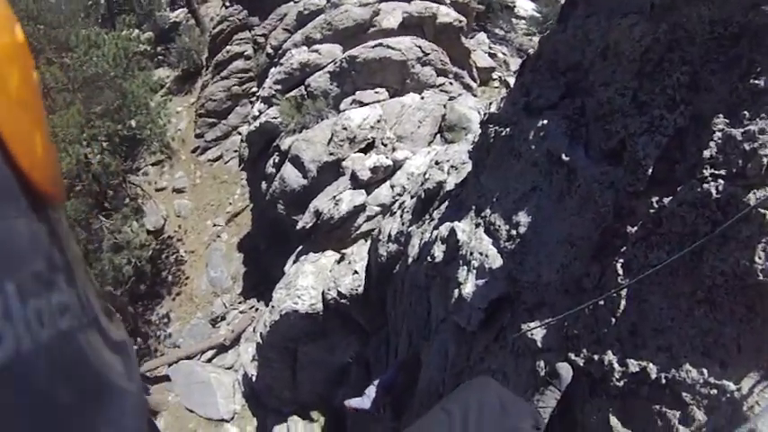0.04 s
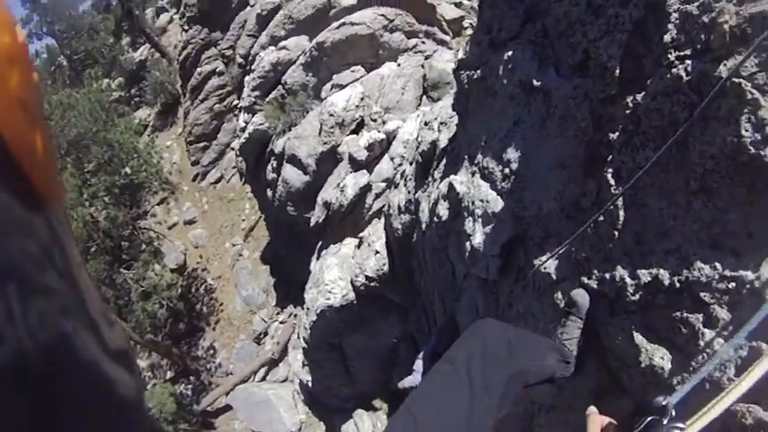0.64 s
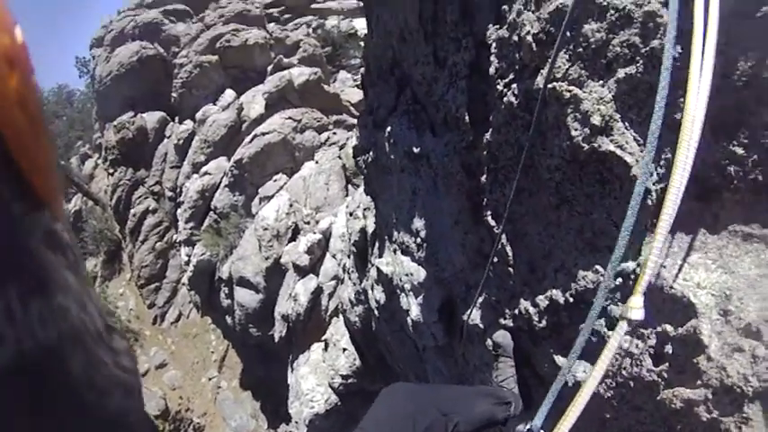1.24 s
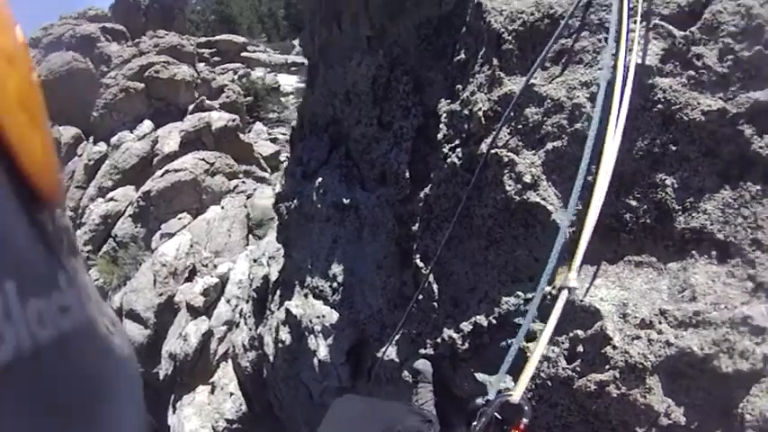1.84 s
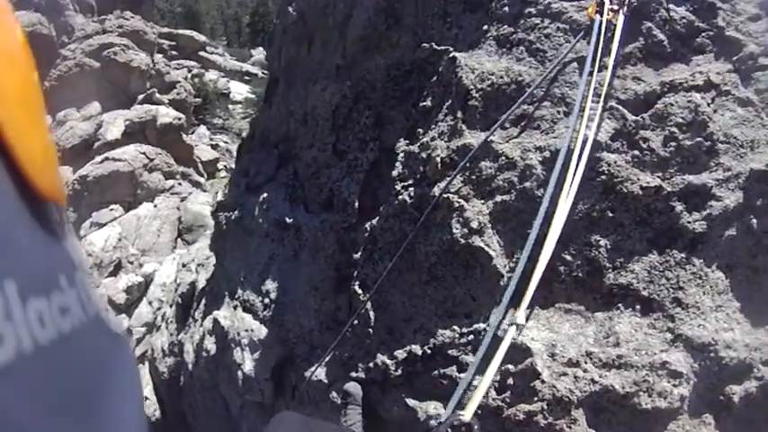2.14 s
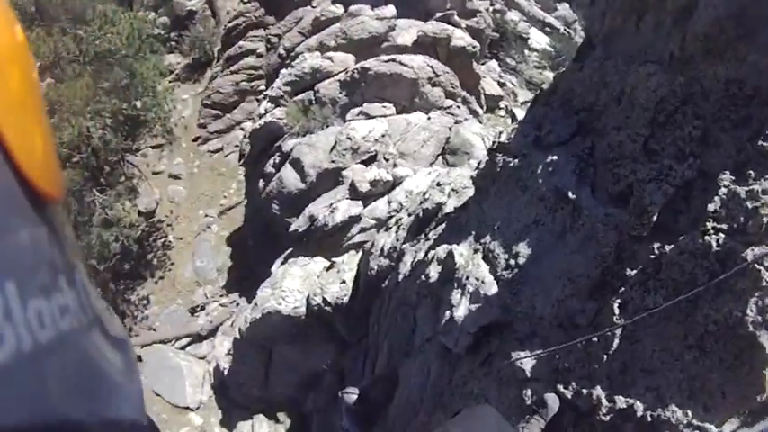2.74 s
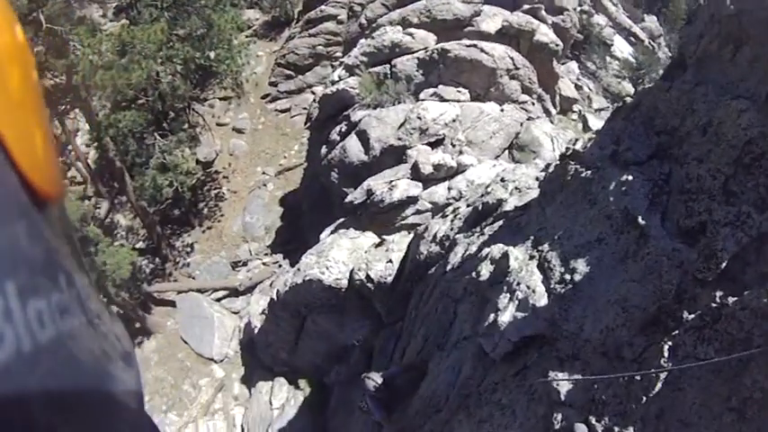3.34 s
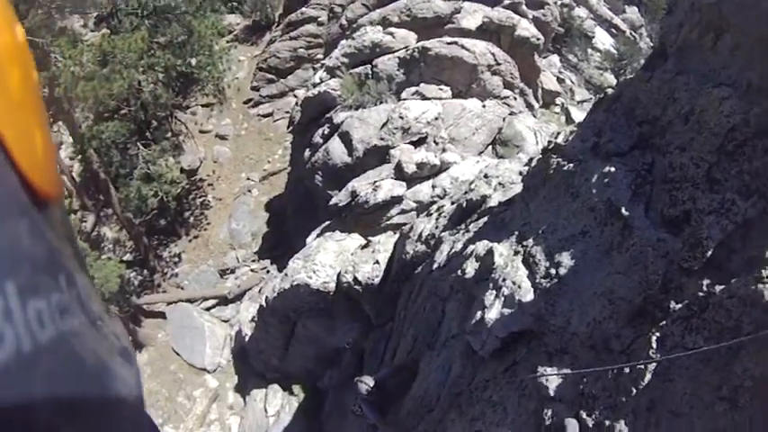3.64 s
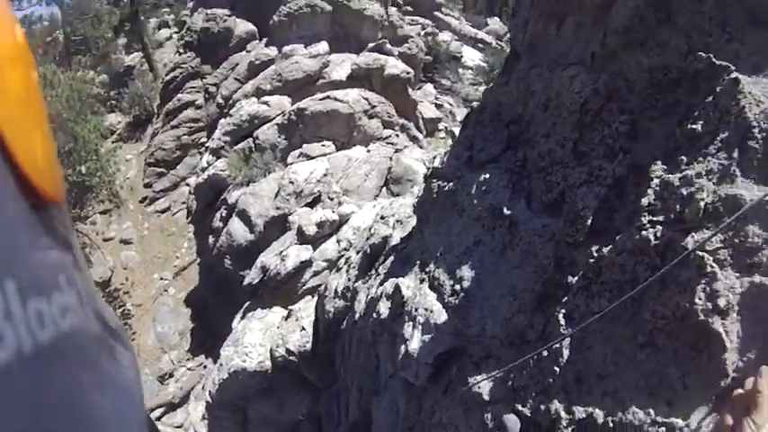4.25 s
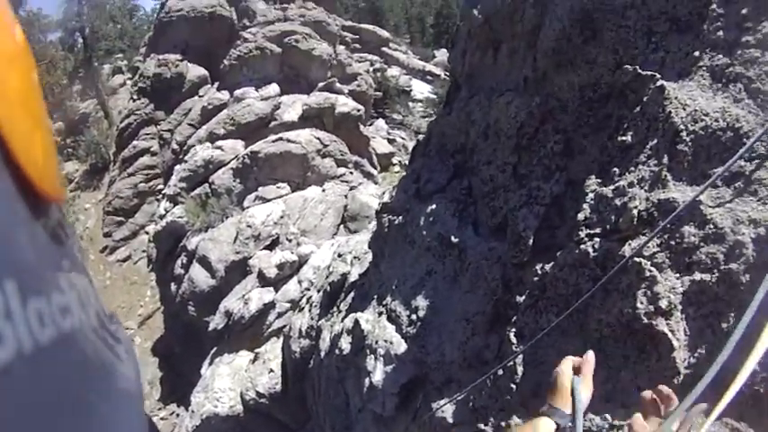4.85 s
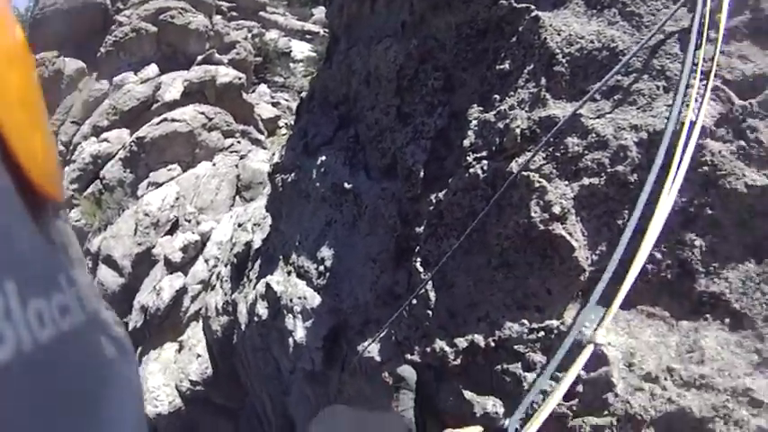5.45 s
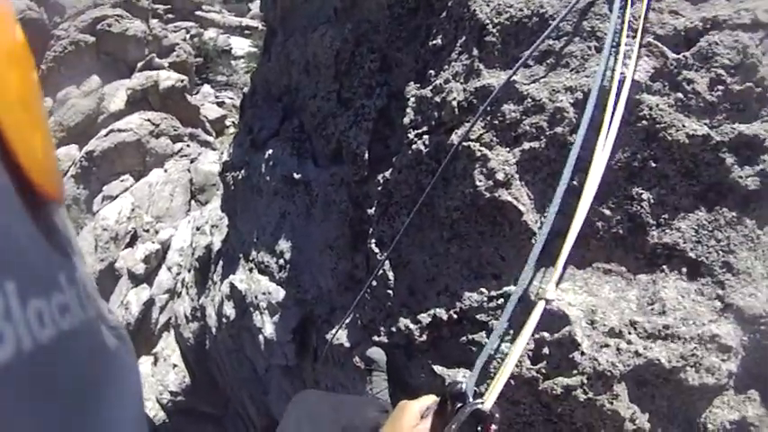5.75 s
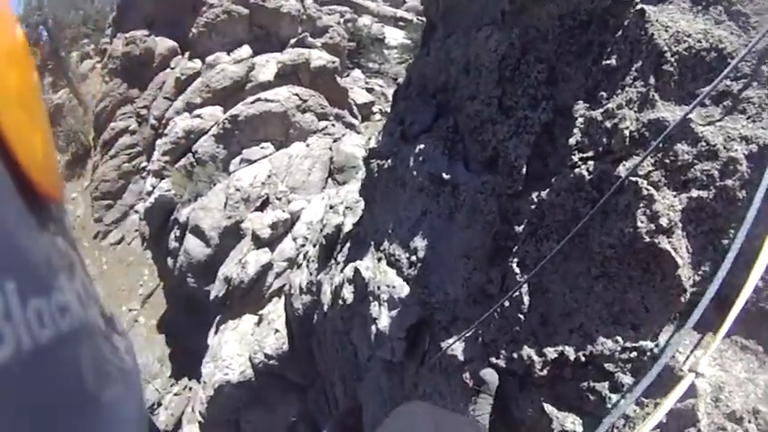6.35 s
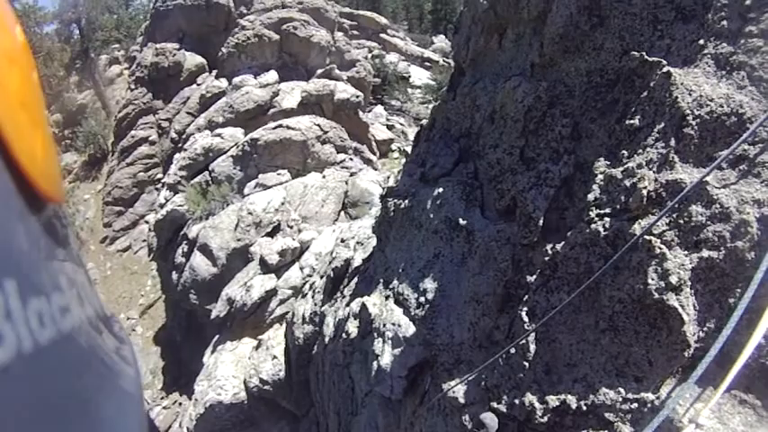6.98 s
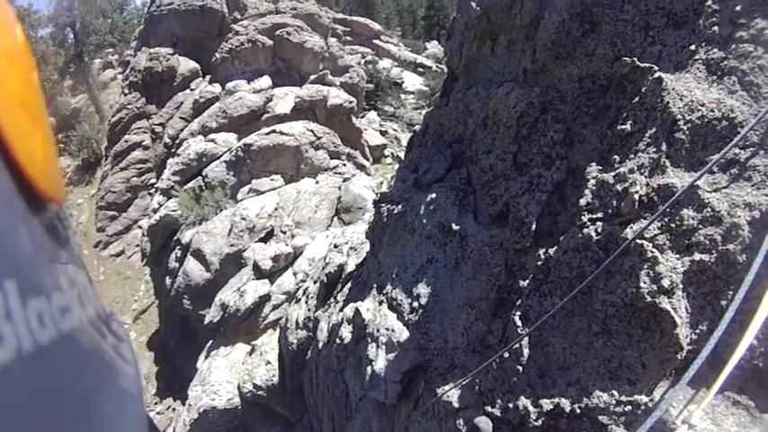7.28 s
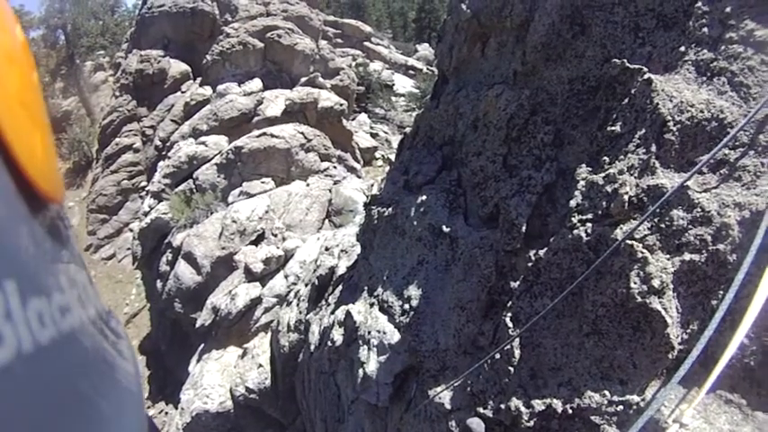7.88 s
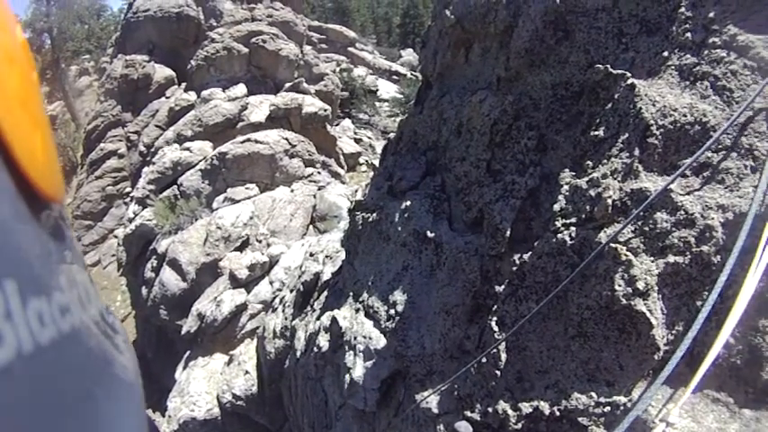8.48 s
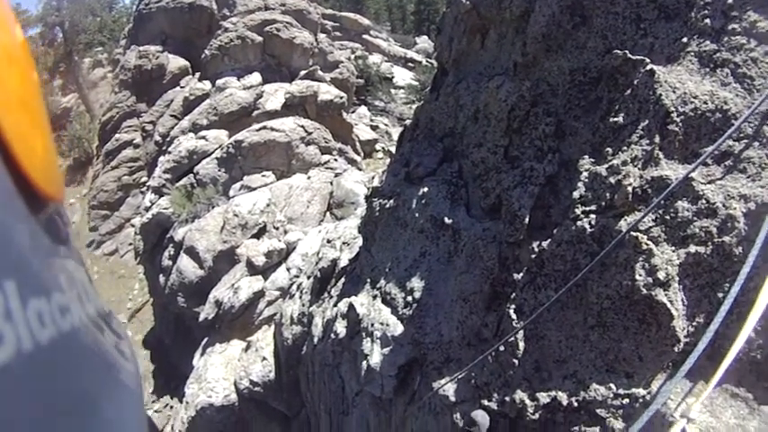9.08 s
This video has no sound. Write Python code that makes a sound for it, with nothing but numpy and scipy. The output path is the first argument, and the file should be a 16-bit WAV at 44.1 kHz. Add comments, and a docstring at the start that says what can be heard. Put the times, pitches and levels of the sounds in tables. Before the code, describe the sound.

A few climbing gear clicks and soft scuffs on a rock face, with light wind building into two strong, rumbling gusts.

```python
"""Wind on a rock face

Gusts buffet a microphone worn by a climber: light puffs at first, then two strong blows.
Swirling air rumbles and thumps on the microphone's opening. The climber scuffs against rope
and rock, and metal gear clicks a few times. Behind it lie the valley's soft rush and a fine hiss."""
import sys
import numpy as np
from scipy import signal
from scipy.io import wavfile
from scipy.ndimage import uniform_filter1d

SR = 44100
rng = np.random.default_rng(int(sys.argv[2]) if len(sys.argv) > 2 else 0)


def store_pcm(level_fs):
    """Save levels as 16-bit WAV."""
    pcm = np.round(np.clip(level_fs, -1, 1) * 32767).astype(np.int16)
    wavfile.write(sys.argv[1], SR, np.atleast_2d(pcm).T)


N = 406602
TIME = np.arange(N) / SR


def from_db(db):
    """Turn decibels into a number to multiply by."""
    return 10 ** (np.asarray(db) / 20)


def rms_one(x):
    """Scale a signal so its average strength (rms) is 1."""
    return x / np.sqrt(np.mean(x ** 2) + 1e-20)


def in_time(rows):
    """Join (time, value) points with straight lines, one value per sample."""
    return np.interp(TIME, *np.transpose(rows))


def at_hz(points, hz):
    """Read between (frequency, value) points, with octaves evenly spaced."""
    freqs, values = np.transpose(points)
    return np.interp(np.log(hz), np.log(freqs), values)


def band(x, low_hz, high_hz):
    """Keep the sound between two frequencies."""
    sos = signal.butter(2, [low_hz, min(high_hz, .45 * SR)], "band", fs=SR, output="sos")
    return signal.sosfilt(sos, x)


def resonance(x, hz, width):
    """Ring at one pitch; a smaller width rings longer."""
    r = np.exp(-np.pi * width / SR)
    feedback = [1, -2 * r * np.cos(2 * np.pi * hz / SR), r * r]
    return signal.lfilter(np.array([1, 0, -1]) * (1 - r * r) / 2, feedback, x + 1e-18)


def ring(x, tones):
    """Ring at several pitches at once, every second one flipped in sign."""
    return sum((-1) ** k * from_db(db) * resonance(x, hz, width)
               for k, (hz, width, db) in enumerate(tones))


def drift(rate):
    """A smooth random wobble of size about 1, changing about rate times a second."""
    r = np.exp(-40 * np.pi * rate / SR)
    slow = signal.lfilter([1], [1, -2 * r, r * r], rng.standard_normal(N // 20 + 4002))[4000:]
    return np.interp(np.arange(N) / 20, np.arange(len(slow)), rms_one(slow))


# how alike left and right are in the background: (frequency [Hz], likeness [0 to 1])
STEREO_LIKENESS = [(100, .998), (400, 0.99), (1000, 0.91), (5200, 0.68), (7000, 1), (15000, 1)]
def background(spectrum):
    """Steady stereo noise, shaped half an octave at a time."""
    edges = 22 * 2 ** np.arange(0, 10, .5)
    white, out = rng.standard_normal((2, 2, N)), 0
    for k, (low, high) in enumerate(zip(edges, edges[1:])):
        mid, side = band(white[k % 2], low, high)
        hz = np.sqrt(low * high)
        alike = np.clip(at_hz(STEREO_LIKENESS, hz), 0, 1)
        stereo = np.sqrt(1 + alike) * mid + np.sqrt(1 - alike) * side * [[1], [-1]]
        out = out + from_db(at_hz(spectrum, hz)) * stereo
    return rms_one(out)


# the valley's tone, from bass to treble: (frequency [Hz], relative level [dB])
VALLEY_TONE = [(25, -7), (60, -12.5), (150, -7.5), (230, -5.5), (340, 2), (500, -5.5), (750, -7),
               (1300, -20), (3000, -22.5), (8000, -35)]
# how loud the valley is: (time [s], level [dB])
VALLEY_LOUDNESS = [(0, -68.5), (.8, -64.5), (1.4, -65), (2.2, -66.5), (3.2, -67.5), (5, -67.5),
                   (6.2, -68.5), (9.22, -76)]
def valley_rush():
    """The valley's soft, low rush swells a little, then slowly fades."""
    return from_db(in_time(VALLEY_LOUDNESS)) * background(VALLEY_TONE)


# the tone of the hiss: (frequency [Hz], relative level [dB])
HISS_TONE = [(530, -29), (900, -0.5), (1040, -3), (1130, -4), (1210, 1), (1300, -0.5), (2320, -2.5),
             (6260, -5.5), (14700, -9), (15200, -10)]
# how the hiss rises and falls: (time [s], relative level [dB])
HISS_LOUDNESS = [(0, -69.5), (6.38, -69), (6.7, -75), (7.2, -74.5), (7.58, -69), (7.8, -69.5),
                 (8.13, -72.5), (8.5, -70), (9.22, -69.8)]
def fine_hiss(boost_db=2.5):
    """A thin hiss that sinks for a while during each strong blow."""
    return from_db(in_time(HISS_LOUDNESS) + boost_db) * background(HISS_TONE)


def swell(start, end, rise_db_per_s=439, fall_db_per_s=304):
    """A gust rises quickly, holds and dies away; given in dB, with 0 at full strength."""
    return -rise_db_per_s * np.maximum(start - TIME, 0) - fall_db_per_s * np.maximum(TIME - end, 0)


# the weak breeze between puffs: (time [s], level [dB])
WEAK_BREEZE = [(0, -66), (0.55, -79), (1.15, -71), (1.7, -80), (2.28, -82), (2.67, -57), (3.2, -80),
               (4.5, -64.5), (5.15, -61), (6.2, -73)]
# light puffs: (start [s], end [s], level [dB], swirl [octaves])
# swirl is extra air speed, which brightens the rumble
LIGHT_PUFFS = [(0.04, 0.205, -52.5, -0.19), (0.292, 0.302, -54.5, -0.21), (1.486, 1.516, -60, .07),
               (2.35, 2.496, -61, 0), (2.531, 2.596, -49, -0.059), (2.759, 2.819, -49.5, 0.011),
               (3.432, 3.73, -56, -0.22), (3.786, 3.902, -47.5, 0.0001), (3.98, 4.103, -51.5, -0.19),
               (4.2, 4.349, -55, -0.21), (4.43, 4.862, -52, -0.23), (4.549, 4.653, -46, -0.019),
               (4.758, 4.866, -47, -0.16), (5.26, 5.306, -52, -0.058), (5.535, 5.66, -44, 0.00048),
               (5.71, 5.793, -53.5, 0.0023), (5.899, 5.92, -47, 0.35), (6.145, 6.17, -63.5, 0)]
# two strong blows, one list each: (time [s], level [dB], swirl [octaves])
STRONG_BLOWS = [
    [(6.32, -48, -.23), (6.39, -46, -0.047), (6.44, -32, 0.076), (6.52, -34.5, -0.16), (6.57, -38.5, -0.19),
     (6.7, -36, 0.32), (6.81, -39.5, 0.27), (6.9, -32, .22), (7.06, -34, 0.089), (7.22, -44, 0.056),
     (7.43, -44, -0.027), (7.75, -53, 0.18)],
    [(7.82, -44.5, -0.23), (7.92, -38, 0.087), (8.05, -39, -0.11), (8.11, -31.5, -0.15), (8.17, -40, 0.033),
     (8.28, -35.5, 0.094), (8.38, -38.5, 0.11), (8.52, -32.5, 0.099), (8.68, -34.5, 0.13), (8.77, -31, .1),
     (8.92, -39, 0.046), (9.22, -37.5, -0.15)],
]
def moving_air(strong_db=-35, db_per_doubling=24.0):
    """Add breeze and gusts into a rumble level (dB) and a relative air speed: faster air is louder."""
    gusts = [(db + swell(start, end), swirl) for start, end, db, swirl in LIGHT_PUFFS]
    for blow in STRONG_BLOWS:
        s, db, swirl = np.transpose(blow)
        gusts.append((np.interp(TIME, s, db) + swell(s[0], s[-1]), np.interp(TIME, s, swirl)))
    power, swirling = from_db(in_time(WEAK_BREEZE)) ** 2, 0
    for db, swirl in gusts:
        share = from_db(np.maximum(db, -140)) ** 2
        power = power + share
        swirling = swirling + share * swirl
    level_db = 10 * np.log10(power)
    return level_db, 2 ** ((level_db - strong_db) / db_per_doubling + swirling / power)


# the tone of churning air in a strong gust: (frequency [Hz], relative level [dB])
GUST_TONE = [(20, -22), (45, -7.5), (90, 0), (165, 3.5), (300, 0), (420, -13), (550, -19.5), (700, -29.5),
             (950, -41), (1500, -53), (3000, -92)]
def wind_rumble(level_db, air_speed, lump_db=1.5, flutter_octaves=0.12, waver_db=0.93, trim_db=-0.13):
    """Air churns on the microphone's opening; faster air sweeps past at a higher pitch."""
    lumps = drift(rate=60)  # each lump of air briefly raises both pressure and speed
    speed = air_speed * 2 ** (flutter_octaves * lumps)
    edges = 16 * 2 ** np.arange(0, 7.6, .5)
    white, flow = rng.standard_normal((2, N)), 0
    for k, (low, high) in enumerate(zip(edges, edges[1:])):
        limits = low / 1.05, high * 1.05
        noise = band(band(white[k % 2], *limits), *limits)
        flow = flow + noise * from_db(at_hz(GUST_TONE, np.sqrt(low * high) / speed))
    flow = flow * from_db(lump_db * lumps)
    # even out the noise so the gust sets the slow swell, then let it waver a little
    even = flow / np.sqrt(uniform_filter1d(flow ** 2, size=2600) + 1e-20)
    return even * from_db(level_db + trim_db + waver_db * drift(rate=14))


# the biggest eddies (whirls of air): (time [s], relative peak level [dB], pitch [Hz])
BIG_EDDIES = [(0.1477, -35.5, 134), (2.5581, -28.5, 153), (3.846, -34.5, 250), (6.7435, -20.5, 254),
              (6.875, -25, 298), (6.9464, -24, 374), (7.0579, -18, 270), (7.093, -28, 302),
              (8.013, -28.5, 312), (8.1115, -20, 280), (8.482, -21, 236), (8.773, -23, 295)]
def eddy_thumps(level_db, air_speed, small_per_s=6, scatter_db=3.5, trim_db=-4.5):
    """An eddy crossing the microphone gives one push and one pull of pressure."""
    out, sizes = np.zeros(N), rng.standard_normal(N)
    # smaller eddies come at random, sized by the rumble and pitched by the air speed
    small = [(TIME[i], level_db[i] + 3.5 + scatter_db * sizes[i], 267 * air_speed[i])
             for i in np.flatnonzero(rng.random(N) < small_per_s / SR)]
    for s, peak_db, hz in BIG_EDDIES + small:
        near = slice(*np.searchsorted(TIME, [s - 1 / 20, s + 1 / 20]))
        phase = 2 * np.pi * hz * (TIME[near] - s)
        out[near] -= from_db(peak_db + trim_db) * 2 * np.tanh(phase) / np.cosh(phase)
    return out


def wind_width(wind, width_db=-40):
    """Left and right feel nearly the same air; only a trace of the rumble differs."""
    strength = np.sqrt(np.abs(uniform_filter1d(wind ** 2, size=2000)))
    low_noise = rms_one(band(rng.standard_normal(N), low_hz=20, high_hz=420))
    return from_db(width_db) * strength * low_noise * [[1], [-1]]


# rubs of shoe, sleeve and rope: (time [s], level [dB], half length [s], pitch [Hz])
RUBS = [(0.658, -67, 0.0058, 1140), (0.78, -58, 0.025, 1460), (0.863, -61, 0.0075, 1510),
        (1.082, -64, .007, 1830), (1.151, -54.5, 0.0052, 425), (1.195, -68.5, .02, 1920),
        (1.285, -60, 0.0044, 610), (1.481, -63.5, 0.049, 1570), (2.733, -66, 0.029, 1480),
        (3.815, -58.5, 0.011, 1760), (4.364, -66, .05, 730), (8.378, -61, 0.0033, 1190)]
def scuffs(grain_db=3.0, spread=1.45):
    """Rubbing catches and slips in tiny grains during each short stroke."""
    grains = rng.standard_normal(N) * from_db(grain_db * drift(rate=130))
    out = np.zeros(N)
    for s, level_db, half, hz in RUBS:
        near = np.abs(TIME - s) < 1 / 5
        stroke = np.exp(-.5 * ((TIME[near] - s) / half) ** 2)
        limits = hz / spread, hz * spread
        out[near] += from_db(level_db) * stroke * rms_one(band(band(grains[near], *limits), *limits))
    return out


# the tones the metal gear rings with: (pitch [Hz], width [Hz], relative level [dB])
METAL_TONES = [(1170, 150, 2), (1880, 130, 2.5), (2270, 190, 4.5), (2650, 120, 6), (3160, 360, -3.5),
               (3800, 310, 0), (4420, 150, -1), (5770, 630, 0), (7320, 170, -4.5), (8360, 960, 0),
               (9740, 520, -3.5), (12000, 750, 0), (14500, 1100, -5)]
# the duller tones of gear knocking on rock: (pitch [Hz], width [Hz], relative level [dB])
KNOCK_TONES = [(403, 97, 0), (690, 650, -2), (996, 65, 4.5), (1415, 73, -5.5), (1750, 31, -9)]
# each touch of the gear: (time [s], level of the first 4 ms [dB], knock compared with metal [dB],
# brightest pitch [Hz], width around that pitch [Hz], time to fade by 60 dB [s])
GEAR_TOUCHES = [(0.6838, -43.5, 5.5, 3980, 700, 0.014), (.9214, -60.5, -16, 6000, 4000, .018),
                (1.4299, -51.5, -4, 4700, 2000, 0.029), (1.737, -56.5, -23, 4600, 250, 0.027),
                (2.6534, -57.5, -1, 2440, 700, .02), (3.9453, -61, -20, 8000, 4000, 0.017),
                (3.978, -62, -20, 8000, 4000, 0.018), (4.5862, -45, -31, 8000, 6000, 0.012),
                (4.5903, -55, -27, 7000, 5000, .01), (4.598, -32.5, -11, 4200, 8000, 0.024),
                (4.7241, -44, -11.5, 5540, 3500, 0.029)]
def gear_clicks(crack_db=-9, broad_db=-4, split_hz=5200, treble_life=0.7):
    """Each touch sets the metal chattering for a moment, with a duller knock under it."""
    out, t = np.zeros(N), TIME[:SR // 10]
    attack = 1 - np.exp(-t * 4000)
    for s, level_db, knock_db, hz, width, fade_s in GEAR_TOUCHES:
        noise = rng.standard_normal((2, len(t)))
        fade_db = -60 * t / fade_s
        lower = band(noise[0], SR / 64, split_hz) * from_db(fade_db)
        treble = band(noise[1], split_hz, 20000) * from_db(fade_db / treble_life)  # dies sooner
        chatter = (lower + treble) * attack
        metal = from_db(crack_db) * band(chatter, 1950, 13500) + ring(chatter, METAL_TONES)
        # the place and hardness of the touch bring out one range of pitches
        metal = rms_one(from_db(broad_db) * rms_one(metal) + rms_one(resonance(metal, hz, width)))
        # the knock is one firm push followed by a little rattle
        push = signal.unit_impulse(len(t), SR // 1000) + noise[1] * from_db(fade_db) / 20
        click = metal + from_db(knock_db) * rms_one(ring(push, KNOCK_TONES))
        start = round(s * SR)
        out[start:start + len(t)] += from_db(level_db) * click / np.std(click[:SR // 250])
    return out


def scene(left_db=-0.7, right_lag_samples=0.22):
    """Wind and climber sit near the centre; the background is a little wider."""
    level_db, air_speed = moving_air()
    wind = wind_rumble(level_db, air_speed) + eddy_thumps(level_db, air_speed)
    climber = gear_clicks() + scuffs()
    # gear and scuffs: the left is turned down slightly, the right is a touch later and duller
    left = climber * from_db(left_db)
    right = np.interp(np.arange(N) - right_lag_samples, np.arange(N), climber)
    return valley_rush() + fine_hiss() + wind + wind_width(wind) + np.array([left, right])


def record(dry, cutoff_hz=15350):
    """Cut away the very highest treble steeply."""
    return signal.sosfilt(signal.ellip(12, .1, 80, cutoff_hz, fs=SR, output="sos"), dry)


dry = scene()
out = record(dry)
store_pcm(out)
```